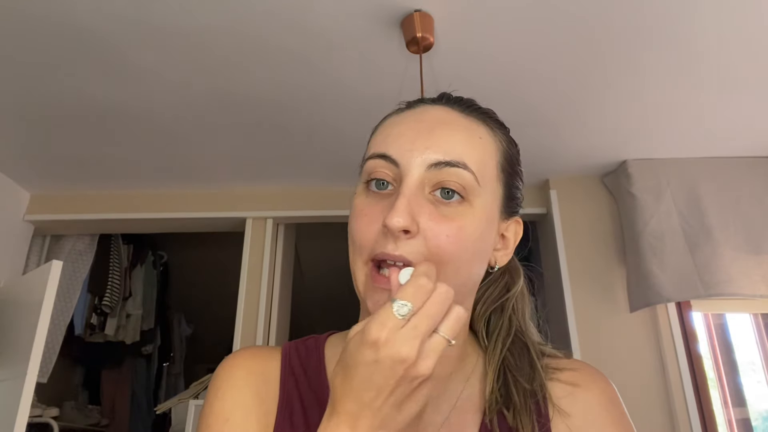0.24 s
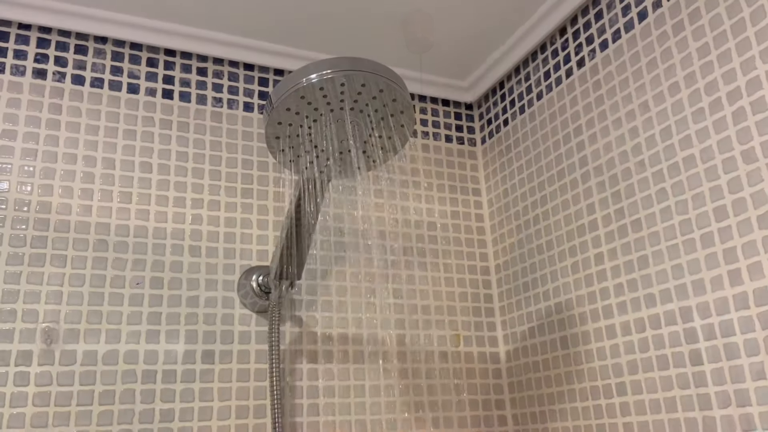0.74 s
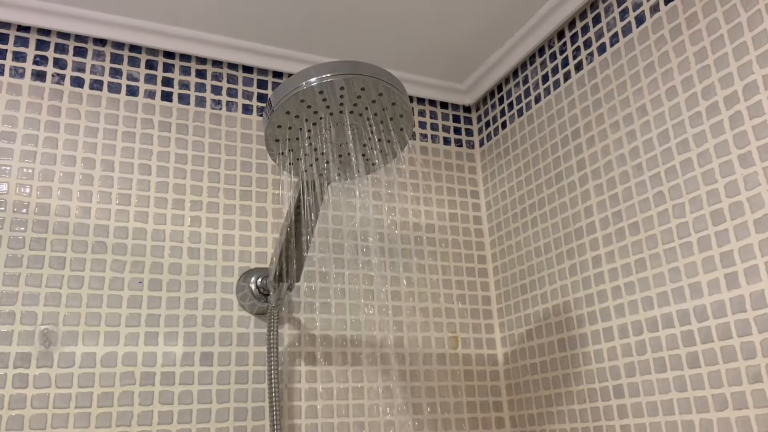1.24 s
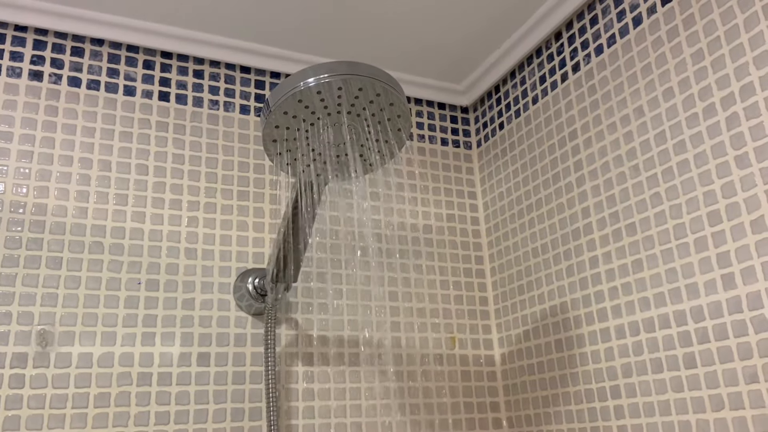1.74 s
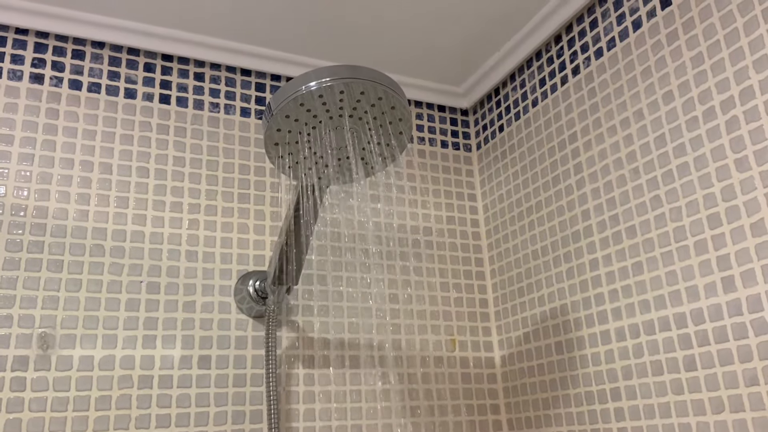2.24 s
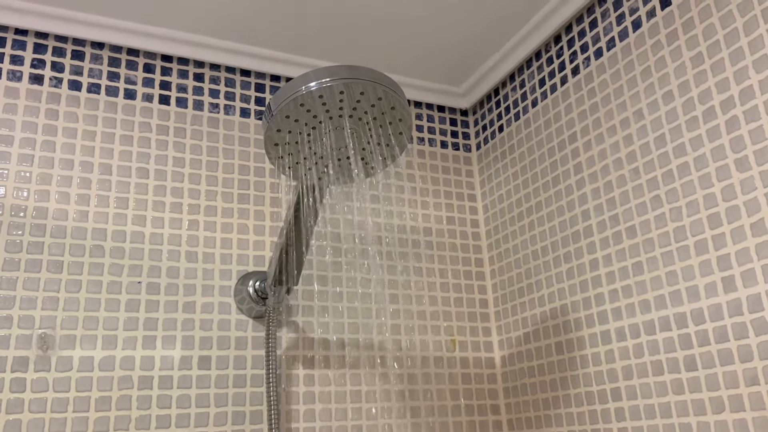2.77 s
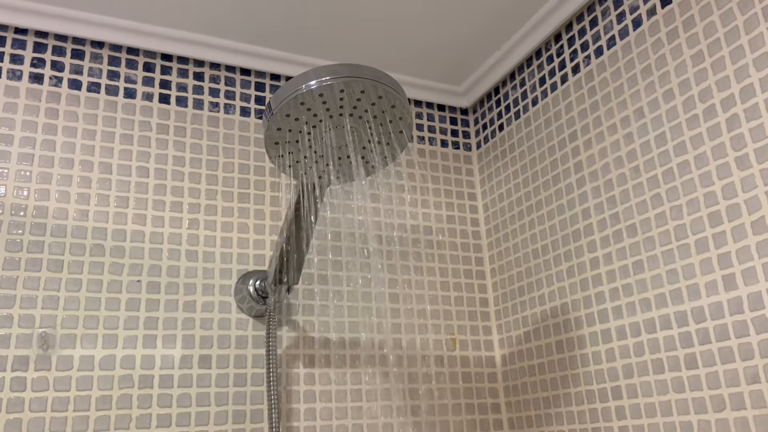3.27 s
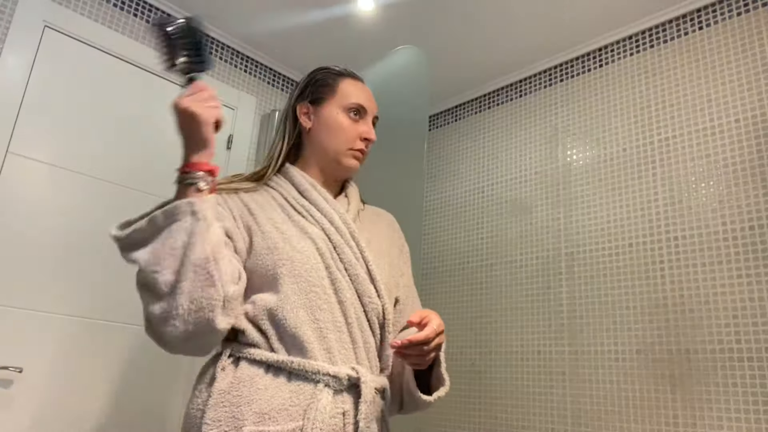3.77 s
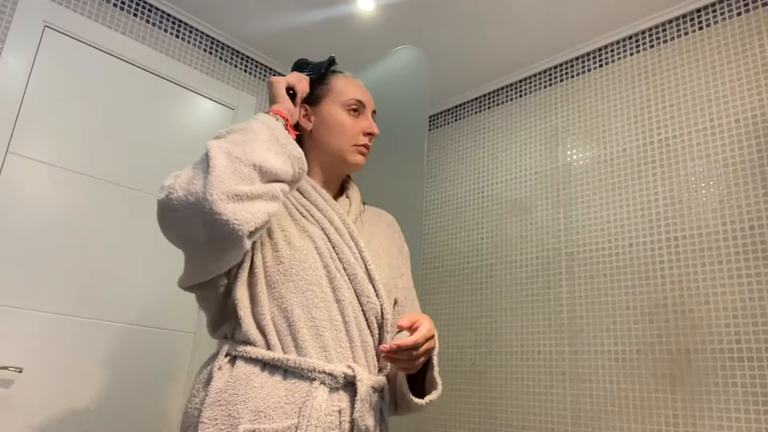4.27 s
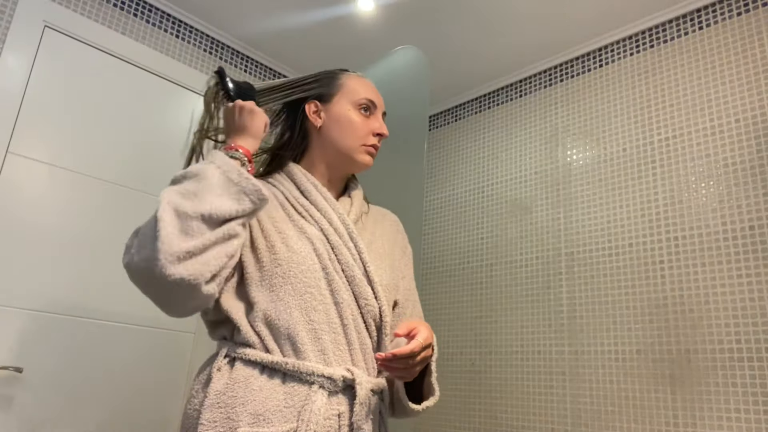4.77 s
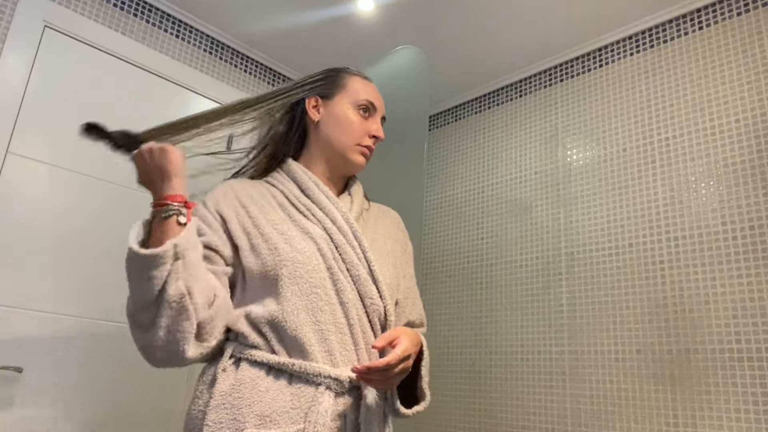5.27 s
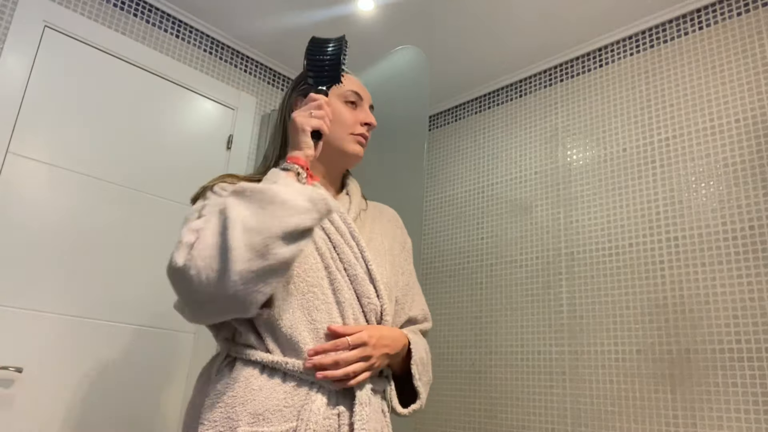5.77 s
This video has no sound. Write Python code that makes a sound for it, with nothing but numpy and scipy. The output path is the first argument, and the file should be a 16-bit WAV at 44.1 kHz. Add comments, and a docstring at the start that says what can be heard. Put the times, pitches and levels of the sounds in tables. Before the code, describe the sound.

A brief near-silent room with faint low bumps gives way to a shower swelling up over half a second. Bright, dense spray hisses and spatters on tiles while heavier drops drum and boom on the tray. It stops dead. In the quiet, bracelets clink, a brush draws once through long hair with a soft, growing hiss, and a robe sleeve rustles. Close stereo microphone in a small tiled bathroom.

```python
"""A shower in a small tiled bathroom: filtered clouds of random ticks hiss, band-limited bursts spatter on the
tiles, and random blows through resonances drum on the tray. It swells up, runs steadily and stops dead.
In the quiet a brush is drawn once through long hair, as a finer tick cloud, with scrapes and a moving sleeve.
Metal bracelets clink on the wrist: ticks, decaying sines and rustling grains. Room noise lies under it all."""
import sys
import numpy as np
from scipy import signal
from scipy.fft import rfft, irfft, next_fast_len
from scipy.io import wavfile
from scipy.ndimage import uniform_filter1d

SR = 44100
rng = np.random.default_rng(int(sys.argv[2]) if len(sys.argv) > 2 else 0)


def materialize(psi):
    """Save the field psi as 16-bit PCM at rate SR to the path in sys.argv[1].

    A 1-D psi becomes a single channel; in a 2-D psi each row is a channel.
    """
    bounded = np.clip(np.atleast_2d(psi).T, -1, 1)
    quanta = np.round(bounded * 32767).astype(np.int16)
    wavfile.write(sys.argv[1], SR, quanta)


N = 265039
T = np.arange(N) / SR
SIZE = next_fast_len(N + 4096, real=True)
HZ = np.fft.rfftfreq(SIZE, 1 / SR)
SHOWER_ON_S, SHOWER_OFF_S = 0.306, 3.739
EDGE_HZ = 15850  # top of the audible band of the whole scene
# bracelets knock together: t/s, tick level/dB, ring level/dB, extra level of the lower modes/dB
KNOCKS = [(3.8042, -42, -48, -16), (3.8838, -29, -48, 0), (3.8888, -36, -48, -8), (3.9586, -42, -45, -3),
          (4.0325, -41, -53, 2), (4.0437, -37, -40, 1), (4.049, -38, -54, -5), (5.525, -41, -60, -12),
          (5.539, -33, -56, -12), (5.544, -37, -58, -10), (5.562, -36, -51, -12), (5.6465, -36, -57, -10),
          (5.656, -34, -44, -15), (5.745, -39, -59, 2), (5.762, -43, -57, 5)]


def gain_of(db):
    """Decibels to amplitude."""
    return 10 ** (np.asarray(db) / 20)


def evened(x):
    """Scales to rms 1."""
    return x / np.sqrt(np.mean(x ** 2) + 1e-20)


def read(points, hz):
    """Reads a curve of (f/Hz, value) on a log-frequency axis."""
    f, value = np.transpose(points)
    return np.interp(np.log(hz + 1), np.log(f + 1), value)


def shaped(x, gain):
    """Filters by a gain for every frequency."""
    return irfft(rfft(x, SIZE) * gain, SIZE)[..., :N]


def ringing(modes):
    """Summed power response of damped modes, from rows of (f/Hz, width/Hz, level/dB)."""
    return sum(gain_of(db) ** 2 / (1 + (2 * (HZ - hz) / width) ** 2) for hz, width, db in modes)


def bells_db(rows):
    """Bell-shaped lifts in dB, from rows of (t/s, rise/dB, half length/s)."""
    return sum(db * np.exp(-.5 * ((T - s) / half) ** 2) for s, db, half in rows)


def swells(rows):
    """Bell-shaped amplitude swells, from rows of (t/s, level/dB, half length/s)."""
    return sum(gain_of(db) * np.exp(-.5 * ((T - s) / half) ** 2) for s, db, half in rows)


def dying(rows, decay_s):
    """Sudden starts that die away, from rows of (t/s, level/dB)."""
    return sum(gain_of(db) * (T >= s) * np.exp(-abs(T - s) / decay_s) for s, db in rows)


def ramp(start_s, length_s):
    """Rises evenly from 0 to 1; with a negative length it falls to 0 at start_s."""
    return np.clip((T - start_s) / length_s, 0, 1)


def flutter(rate_hz, depth_db):
    """A random gain with the given rms depth, wandering mostly below the given rate."""
    wander = shaped(rng.standard_normal(N), (HZ > 3) / (1 + (HZ / rate_hz) ** 2))
    return gain_of(depth_db * evened(wander))


def impacts(per_s, spread_db):
    """A random train of tiny blows whose sizes scatter exponentially in dB."""
    size = gain_of(spread_db * np.minimum(rng.exponential(1, N), 4.5))
    struck = rng.random(N) < per_s / SR
    return evened(size * rng.choice([-1, 1], N) * struck)


def diffuse(pair):
    """Mixes two signals so that long waves are alike at both ports and shorter ones less so."""
    # likeness of sound from all round at the two microphone ports: f/Hz, correlation
    likeness = [(100, .98), (200, .94), (300, .86), (500, .5), (750, .2), (1050, .35), (1500, -.05),
                (3200, .33), (6000, .05)]
    angle = np.arcsin(np.clip(read(likeness, HZ), -1, 1)) / 2
    return shaped(pair, np.cos(angle)) + shaped(pair[::-1], np.sin(angle))


def unlike(pair):
    """Sounds close beside the microphone push its two ports partly in opposite directions."""
    return evened(pair - 0.24 * pair[::-1])


def reverberation(x):
    """Dense reflections off the tiles: each band's energy dies away as noise at its own speed."""
    # decay of the tiled room: f/Hz, t60/s
    tile_decay = [(100, 0.21), (1000, 0.37), (4000, 0.32), (9000, 0.09), (16000, 0.3)]
    hz, t, z = signal.stft(x, SR, nperseg=256)
    # -120 here because this gain acts on energy; the first frame is left to the direct sound
    decay = gain_of(-120 * t[:100] / read(tile_decay, hz)[:, None]) * (t[:100] > 0)
    decay = decay / decay.sum(1, keepdims=True)
    power = signal.fftconvolve(abs(z) ** 2, decay, axes=1)[:, :len(t)]
    noise = signal.stft(rng.standard_normal((2, N)), SR, nperseg=256)[2]
    tail = noise / noise.std() * np.sqrt(abs(power))
    return diffuse(signal.istft(tail, SR, nperseg=256)[1][:, :N])


def ports(x, left_lag_ms):
    """A direct sound reaches the left port with a lag (early if negative) and a fixed phase turn."""
    phase_turns = 0.32 * np.sign(left_lag_ms)
    lag = np.exp(-2j * np.pi * (HZ * left_lag_ms / 1000 + phase_turns))
    return np.array([shaped(x, lag), x])


def placed(x, left_lag_ms, wet_db, direct_hz):
    """Treble comes straight to the ports; below direct_hz the room takes over."""
    direct = 1 / (1 + (direct_hz / (HZ + 1)) ** 6) / (1 + gain_of(wet_db) ** 2)
    straight = ports(shaped(x, np.sqrt(direct)), left_lag_ms)
    return straight + shaped(reverberation(x), np.sqrt(1 - direct))


def tick_cloud(per_s, spread_db, near_hz, left_lag_ms):
    """A cloud of tiny ticks: the treble arrives straight from close by, the rest from all round the room."""
    near_share = .992 / (1 + (near_hz / (HZ + 1)) ** 12)
    near = shaped(impacts(per_s, spread_db), np.sqrt(near_share))
    around = diffuse(np.array([impacts(per_s, spread_db) for _ in range(2)]))
    return ports(near, left_lag_ms) + shaped(around, np.sqrt(1 - near_share))


def patchy(pair, depth_db, size=512):
    """Tints patches of time and frequency at random; longer frames give slower, narrower patches."""
    z = signal.stft(pair, SR, nperseg=size)[2]
    field = uniform_filter1d(rng.standard_normal(z.shape[1:]), size=13, axis=0)
    field = uniform_filter1d(field, size=2, axis=1)
    tinted = z * gain_of(depth_db * evened(field))
    return evened(signal.istft(tinted, SR, nperseg=size)[1][:, :N])


def room_air():
    """A low steady rumble under faint hiss; once the shower has stopped, the room's lowest mode joins it."""
    # colour of the still room: f/Hz, level/dB
    air_colour = [(22, -15.9), (50, 0.0), (100, -3.2), (160, -8.8), (300, -12.9), (550, -17.5),
                  (1200, -23.9), (3000, -28.0), (7000, -31.2), (15000, -33.7)]
    # the room's lowest mode: f/Hz, width/Hz, level/dB
    lowest_mode = [(101, 10, 0)]
    noise = diffuse(rng.standard_normal((2, N)))
    air = evened(shaped(noise, gain_of(read(air_colour, HZ)) / (1 + (24 / (HZ + 1)) ** 4)))
    mode = evened(shaped(diffuse(rng.standard_normal((2, N))), ringing(lowest_mode)))
    return gain_of(-62.5) * air + gain_of(-69) * mode * (T > SHOWER_OFF_S)


def bumps():
    """Soft low bumps in the quiet: sine bursts under a bell, each only a few cycles long."""
    # t/s, level/dB, f/Hz
    bump_rows = [(0.036, -51, 55), (0.22, -58, 90.6), (0.265, -54, 79.8), (4.115, -50.5, 89),
                 (4.37, -54, 62), (4.455, -60, 110), (4.492, -54, 80)]
    half_s = 0.0088
    return sum(swells([(s, db, half_s)]) * np.sin(2 * np.pi * (hz * T + rng.random()))
               for s, db, hz in bump_rows)


def echoed(x):
    """Nearby walls and the glass screen throw the spray back duller, which combs the hiss."""
    # first reflections: delay/ms, level/dB
    reflections = [(1.9, -27.5), (3.7, -20.5), (6.1, -17.5), (9.4, -11.5), (14.3, -14)]
    thrown = sum(gain_of(db) * np.roll(x, round(ms * SR / 1000), axis=-1) for ms, db in reflections)
    return x + shaped(thrown, 1 / (1 + (HZ / 9000) ** 2))


def crackle():
    """Larger single drops snap on the tiles, each a short band-limited click."""
    # band of the snaps: f/Hz, width/Hz, level/dB
    snap_band = [(5340, 2000, 0)]
    snaps = diffuse(np.array([impacts(per_s=220, spread_db=0.5) for _ in range(2)]))
    return gain_of(-31) * evened(shaped(snaps, ringing(snap_band)))


def spatters():
    """Jets break up and slap the tiles: crackling bursts of droplets, each in its own band, with a room tail."""
    # the loud slaps, levels ahead of their band filter: t/s, level/dB, centre f/Hz, decay/s
    slaps = [(0.731, -7, 5400, .011), (0.84, -13, 5770, .005), (0.983, -7.5, 6070, .008),
             (1.061, -13.5, 6040, .005), (1.138, -10.5, 5900, .008), (1.157, -11, 6540, .011),
             (1.246, -5.5, 10050, .011), (1.407, -23.5, 5010, .005), (1.464, -8, 5880, .014),
             (1.595, -4.5, 7800, .007), (1.776, -3, 6000, .007), (1.832, -7.5, 6000, .011),
             (1.928, -12, 5600, .006), (2.039, -16, 4206, .011), (2.127, -12.5, 4800, .005),
             (2.179, -6, 6100, .011), (2.235, -9.5, 5280, .011), (2.46, -15, 5000, .006),
             (2.512, -9.5, 7000, .011), (2.534, -5, 12000, .011), (2.61, -4.5, 4530, .011),
             (2.623, -3, 6980, .012), (2.628, -11, 3480, .011), (2.65, -12.5, 4200, .011),
             (2.686, -29.5, 4800, .005), (2.76, -8, 6300, .008), (2.875, -12, 4840, .013),
             (2.918, -8, 11000, .011), (2.966, -8, 8850, .008), (3.081, -10, 7500, .011),
             (3.12, -12, 4770, .006), (3.186, -7, 5000, .007), (3.223, -7.5, 8540, .011),
             (3.266, -10, 5000, .011), (3.401, -7, 11500, .008), (3.446, -12.5, 5700, .01),
             (3.719, -10, 10000, .011)]
    attack_s, width_octaves = 0.004, 0.93
    out = np.zeros((2, N))
    drops = tick_cloud(per_s=9000, spread_db=1.3, near_hz=6000, left_lag_ms=0.2427)
    # weaker slaps fall at random in between, 14 per second
    run_s = SHOWER_OFF_S - SHOWER_ON_S
    chance = rng.random((round(14 * run_s), 2))
    small = [(SHOWER_ON_S + when * run_s, -20, np.interp(pitch, [0, 1], (4500, 11700)), 0.0047)
             for when, pitch in chance]
    for s, db, centre_hz, decay_s in slaps + small:
        near = abs(T - s) < 5 * decay_s
        age = T[near] - s
        burst = gain_of(db) * drops[:, near] * np.exp(np.minimum(age / attack_s, -age / decay_s))
        band = np.minimum(centre_hz * 2 ** (width_octaves * np.array([-.5, .5])), EDGE_HZ)
        out[:, near] += signal.lfilter(*signal.butter(2, band, "band", fs=SR), burst)
    return out + gain_of(-16) * reverberation(out[0])


def spray():
    """Thousands of drops tick on the tiles in uneven clumps, under the slaps of broken jets."""
    # colour of the spray: f/Hz, level/dB
    spray_colour = [(1500, -8.7), (2300, -9.2), (3500, -7.2), (5000, -3.6), (7000, -1.9), (9000, 0.0),
                    (12500, 0.1), (15500, -3.6)]
    colour = gain_of(read(spray_colour, HZ)) / (1 + (1200 / (HZ + 1)) ** 4) * (HZ < EDGE_HZ)
    colour = colour * gain_of(3.8 * np.clip((HZ - 12500) / 3000, 0, 1))  # the finest mist fizzes on top
    drops = shaped(tick_cloud(per_s=13000, spread_db=2.05, near_hz=6200, left_lag_ms=0.2408), colour)
    clumps = flutter(rate_hz=30, depth_db=0.47)
    hiss = (patchy(echoed(drops), depth_db=1.63) * gain_of(-17.5) + crackle()) * clumps
    lean_db = 1.0 * np.exp(-np.log((HZ + 1) / 3800) ** 2 / 0.16)  # the left wall is the nearer one
    return shaped(hiss + spatters(), gain_of([lean_db, -lean_db]))


def patter():
    """Heavy drops drum on the tray and ring the stall, favouring now one resonance, now another."""
    # colour of water landing on the tray: f/Hz, level/dB
    tray_colour = [(25, -19), (45, -10.5), (65, 5), (150, -10.5), (200, -3), (280, -1), (400, -5),
                   (550, -3), (750, -4), (1000, -1.5), (1400, -4.5)]
    # resonances of tray and stall: f/Hz, width/Hz, level/dB
    stall_modes = [(150, 9.6, 11), (194, 7.9, 10.5), (210, 10, 7.5), (255.6, 13, 10), (295, 27, 7),
                   (335.4, 13, 9.5), (374, 11, 9), (467, 19, 9.5), (484, 20, 6.5), (556.6, 18, 9.5),
                   (592, 14, 4.5), (697, 15, 7.5), (712, 12, 7), (773, 14, 3), (818, 15, 0.5),
                   (939, 54, 3.5), (1037, 38, 1.5)]
    # a heavier gush lands on the tray: t/s, level/dB, half length/s
    gush_rows = [(2.515, -35.5, 0.02)]
    # the tray rings more while it is still dry: f/Hz, width/Hz, level/dB
    dry_mode = [(268, 46, 0)]
    # and when it does: t/s, level/dB, half length/s
    dry_swells = [(1.1, -46, 0.27)]
    blows = diffuse(np.array([impacts(per_s=1800, spread_db=2.0) for _ in range(2)]))
    colour = gain_of(read(tray_colour, HZ)) * np.sqrt(1 + ringing(stall_modes)) / (1 + (HZ / 1700) ** 4)
    colour = colour / (1 + (120 / (HZ + 1)) ** 6)
    drumming = patchy(shaped(blows, colour), depth_db=1.1, size=4096) * flutter(rate_hz=28, depth_db=0.23)
    # the patter eases by 0.15 dB per second as the tray gets wet
    level = gain_of(-30 - 0.15 * (T - SHOWER_ON_S)) + swells(gush_rows)
    dry_tray = evened(shaped(blows, ringing(dry_mode))) * swells(dry_swells)
    return (drumming * level + dry_tray) * gain_of([[1.8], [.9]])  # trim of left and right, dB


def boom():
    """The lowest modes of the tray, kept ringing by the falling water; they throb and slowly grow."""
    # deep resonances of the tray: f/Hz, width/Hz, level/dB
    boom_modes = [(58.4, 27, -7), (75, 9.8, -1.5), (108, 16, -1.5)]
    # throbs: t/s, rise/dB, half length/s
    throb_rows = [(1.244, 6, 0.036), (1.572, 2.5, 0.057), (1.896, 3.5, 0.046), (2.22, 2.5, 0.085),
                  (3.245, 7, 0.041), (3.65, 3.5, .05)]
    blows = diffuse(rng.standard_normal((2, N)))
    hum = shaped(blows, np.sqrt(ringing(boom_modes)) / (1 + (HZ / 135) ** 10) / (1 + (42 / (HZ + 1)) ** 6))
    # level out the noise's own swells, so that flutter and throbs shape it
    steady = hum / np.sqrt(uniform_filter1d((hum ** 2).mean(0), size=6000))
    growth_db = 0.84 * (T - SHOWER_ON_S)
    level_db = -38 + growth_db + bells_db(throb_rows)
    side_db = np.array([[-.8], [.8]])
    return steady * flutter(rate_hz=10, depth_db=0.86) * gain_of(level_db + side_db)


def plops():
    """Fat drops land on the tray, each a short hollow note that the room prolongs."""
    # t/s, level/dB, f/Hz
    plop_rows = [(0.362, -45, 600), (0.559, -28.5, 420), (0.612, -25, 590), (0.633, -28, 477),
                 (1.202, -23.5, 356), (1.827, -27, 580), (2.114, -21.5, 470), (2.259, -28, 358),
                 (3.15, -28, 589), (3.4, -29, 480)]
    attack_s, decay_s = 0.0022, 0.0068
    out = np.zeros(N)
    for s, db, hz in plop_rows:
        near = abs(T - s) < 6 * decay_s
        age = T[near] - s
        shape = np.exp(np.minimum(age / attack_s, -age / decay_s))
        out[near] += gain_of(db) * shape * np.sin(2 * np.pi * (hz * age + rng.random()))
    return out + gain_of(-6.5) * reverberation(out)


def drone():
    """A low resonance as a sine that swells and fades again and again, never quite on one pitch."""
    # t/s, level/dB, half length/s
    drone_swells = [(0.78, -29, 0.027), (1.06, -32, 0.037), (1.34, -29, 0.074), (1.59, -29, .04),
                    (1.74, -38, .03), (1.92, -30.5, 0.056), (2.17, -32.5, 0.071), (2.505, -26, 0.037),
                    (2.655, -24.5, 0.028), (2.84, -27, 0.035), (2.94, -27.5, .04), (3.08, -25.5, 0.023),
                    (3.23, -26, 0.021), (3.385, -25, .055), (3.68, -39, 0.036)]
    centre_hz, waver_hz, waver_rate_hz = 105.2, 2.2, 7.4
    waver = evened(shaped(rng.standard_normal(N), 1 / (1 + (HZ / waver_rate_hz) ** 4)))
    turns = np.cumsum(centre_hz + waver_hz * waver) / SR
    return swells(drone_swells) * np.sin(2 * np.pi * turns) * gain_of([[-.8], [.8]])


def shower():
    """The hiss swells over half a second, patter and boom lag behind it; the cut leaves only a brief trace."""
    after_s = np.maximum(T - SHOWER_OFF_S, 0)
    cut = np.exp(-after_s / 0.002)
    linger = gain_of(-15.5) * np.exp(-after_s / 0.0059)
    hiss = spray() * ramp(SHOWER_ON_S, 0.51)
    drumming = patter() * ramp(SHOWER_ON_S, 0.5) ** 1.13
    low = boom() * ramp(SHOWER_ON_S, 0.54) ** 2.3
    return np.maximum(cut, linger) * (hiss + drumming + low + drone() + plops())


def rasp():
    """A faint short rasp of band-filtered noise that holds for a moment as the water stops, then breaks off."""
    # f/Hz, width/Hz, level/dB
    rasp_bands = [(300, 72, 3), (2920, 750, 5)]
    edge_s = 0.02
    colour = np.sqrt(ringing(rasp_bands)) / (1 + (HZ / 4600) ** 8)
    held = ramp(3.735, edge_s) * ramp(3.824, -edge_s)
    return gain_of(-58.5) * held * evened(shaped(diffuse(rng.standard_normal((2, N))), colour))


def sleeve():
    """The robe's thick towelling moves with soft low noise swishes over a faint, fluttering rub."""
    # the sleeve brushes past: t/s, level/dB, half length/s
    swishes = [(4.54, -66, 0.1), (5.33, -65, 0.08), (5.55, -71, 0.05), (5.99, -62.5, 0.026)]
    # colour of the rub: f/Hz, level/dB
    rub_colour = [(200, -14), (650, 4.5), (1500, 7.5), (4000, 1.5), (8000, -1), (15000, -26)]
    cloth_gain = np.sqrt(ringing([(310, 37, 0)])) / (1 + (HZ / 1800) ** 2)
    cloth = shaped(diffuse(rng.standard_normal((2, N))), cloth_gain)
    rub = evened(shaped(unlike(rng.standard_normal((2, N))), gain_of(read(rub_colour, HZ))))
    rubbing = gain_of(-70.5) * rub * flutter(rate_hz=6, depth_db=3.0) * (T > SHOWER_OFF_S)
    return evened(cloth) * swells(swishes) + rubbing


def metal_rings():
    """Each knock starts the modes of the thin metal at once; they die away at their own speeds."""
    # f/Hz, width/Hz, level/dB against the knock's ring
    metal_modes = [(8200, 60, -8), (8550, 90, -16), (9000, 45, -13.5), (12800, 140, -8), (13500, 70, -2),
                   (14050, 50, -2), (14350, 120, -7)]
    detune, lower_modes_hz = 0.003, 11000  # rms share of pitch; modes under this count as lower
    out, age = np.zeros(N), np.arange(SR // 10) / SR
    for s, _, ring_db, lower_db in KNOCKS:
        part = out[round(s * SR):][:len(age)]
        for hz, width, db in metal_modes:
            mode_hz = hz * (1 + detune * rng.standard_normal())
            wave = np.sin(2 * np.pi * (mode_hz * age + rng.random()))
            level = gain_of(ring_db + db + lower_db * (hz < lower_modes_hz))
            part += level * np.exp(-np.pi * width * age) * wave
    return out


def bracelets():
    """Sharp ticks and short rings of metal on metal, amid a rustle of small links that never quite rest."""
    # links rustle as the arm moves: t/s, level/dB, half length/s
    rustles = [(3.905, -59, 0.038), (4.056, -54, 0.027), (5.385, -59, 0.027), (5.553, -63.5, 0.053),
               (5.65, -70, .04), (5.768, -57, .012), (5.877, -67, .035)]
    # colour of the rustling links: f/Hz, level/dB
    link_colour = [(3000, -40), (7300, -18), (8250, -4), (8750, -8), (8980, 4), (9250, -8), (11000, -10),
                   (13400, -4), (14000, 4), (14600, -1), (16000, -14)]
    knocks = dying([(s, tick_db) for s, tick_db, _, _ in KNOCKS], decay_s=0.00029)
    knocks = knocks * rng.choice([-1, 1], N)
    ticks = shaped(knocks, 1 / (1 + (9000 / (HZ + 1)) ** 4) / (1 + (HZ / 15300) ** 40))
    # after a knock the links settle; from the first one on they keep stirring faintly
    settling = gain_of(-24) * dying([(s, ring_db) for s, _, ring_db, _ in KNOCKS], decay_s=0.039)
    stirring = gain_of(-77.5) * (T > KNOCKS[0][0])
    shaking = np.hypot(swells(rustles) + settling, stirring)
    links = evened(shaped(impacts(per_s=4600, spread_db=2.5), gain_of(read(link_colour, HZ))))
    metal = ticks + metal_rings() + shaking * links
    return placed(metal, left_lag_ms=-0.21, wet_db=-33.0, direct_hz=4000)


def brush():
    """Bristles slip over countless hairs for the length of one stroke, snapping free of tangles on the way."""
    # colour of the hair: f/Hz, level/dB
    hair_colour = [(500, -2.0), (1000, -6.5), (1800, -11.5), (3500, -8.5), (5000, -5), (6500, -3.4),
                   (8500, 0.8), (12000, -0.7), (15500, -5)]
    # the brush drags harder where the hair is thick: t/s, rise/dB, half length/s
    drags = [(4.24, 2, 0.024), (4.8, 2, 0.065)]
    start_s, end_s, bite_s, edge_s = 4.106, 5.335, 0.38, 0.047
    slips = tick_cloud(per_s=9000, spread_db=0.5, near_hz=6940, left_lag_ms=-0.211)
    snags = tick_cloud(per_s=260, spread_db=-2.0, near_hz=6000, left_lag_ms=-0.2)
    colour = gain_of(read(hair_colour, HZ)) / (1 + (650 / (HZ + 1)) ** 2) * (HZ < EDGE_HZ)
    hair = patchy(shaped(slips + gain_of(-12) * snags, colour), depth_db=0.5)
    contact = ramp(start_s, edge_s) * ramp(end_s, -edge_s)
    # a light touch bites in, then the pressure grows by 0.2 dB per second
    pressure_db = -20.5 * (1 - ramp(start_s, bite_s)) + 0.2 * (T - start_s)
    level = gain_of(-56.5 + pressure_db + bells_db(drags))
    return hair * contact * flutter(rate_hz=10.5, depth_db=1.0) * level


def scrape():
    """Bristles scrape the scalp under pressure: a coarser, lower grain than the hiss of the hair."""
    # as they bite in, and again as they pass through the ends: t/s, level/dB, half length/s
    scrape_rows = [(4.5, -65.5, .05), (5.15, -67, .09)]
    grains = unlike(np.array([impacts(per_s=700, spread_db=1.8) for _ in range(2)]))
    colour = 1 / (1 + (450 / (HZ + 1)) ** 4) / np.sqrt(1 + (HZ / 1200) ** 2) / (1 + (HZ / 6500) ** 4)
    return evened(shaped(grains, colour)) * swells(scrape_rows)


def scene():
    """Shower, then bracelets, brush and sleeve, over the still room."""
    return room_air() + bumps() + shower() + rasp() + sleeve() + bracelets() + brush() + scrape()


def record(dry):
    """Steep low-pass that ends the band at EDGE_HZ."""
    low_pass = signal.firwin(511, EDGE_HZ, window=("kaiser", 9), fs=SR)
    return signal.oaconvolve(dry, low_pass[None], "same")


dry = scene()
out = record(dry)
materialize(out)
```